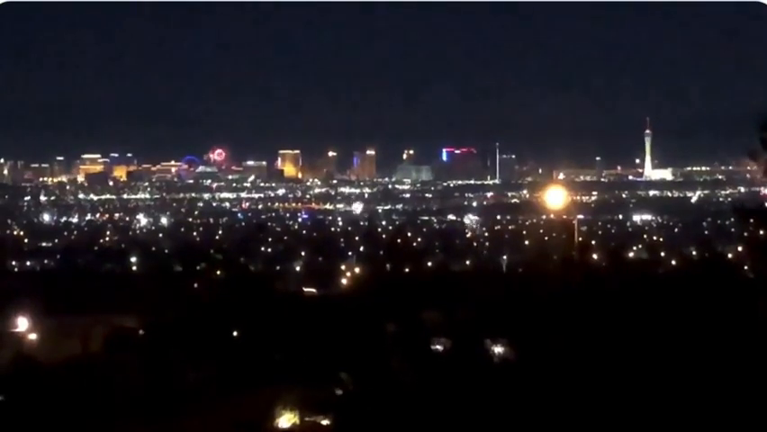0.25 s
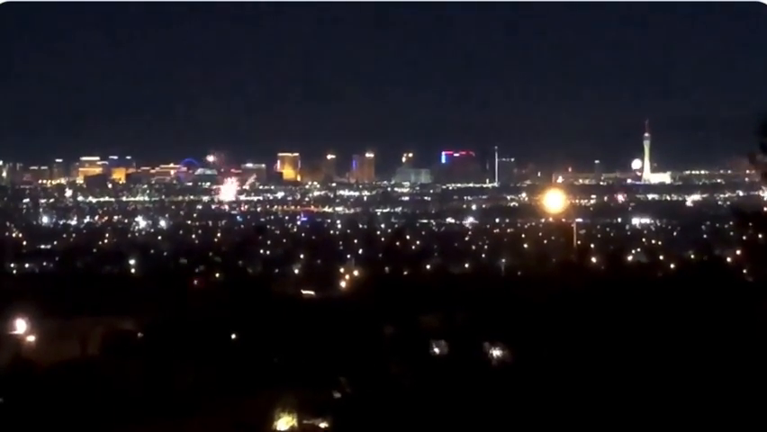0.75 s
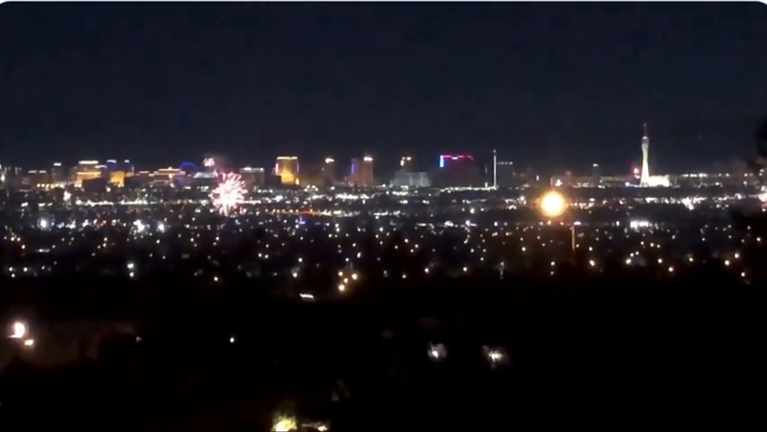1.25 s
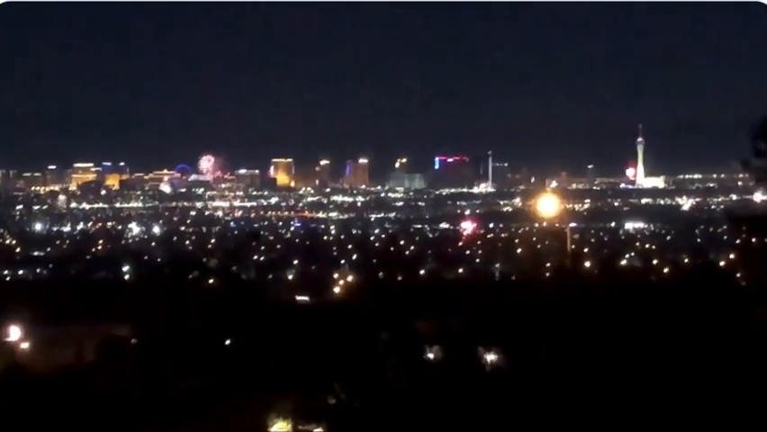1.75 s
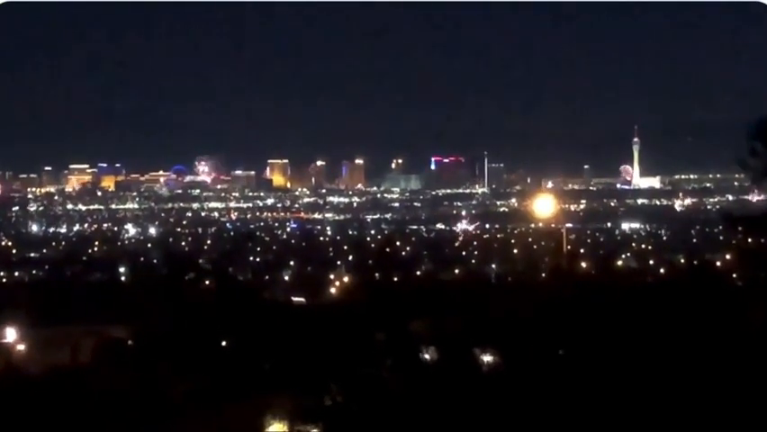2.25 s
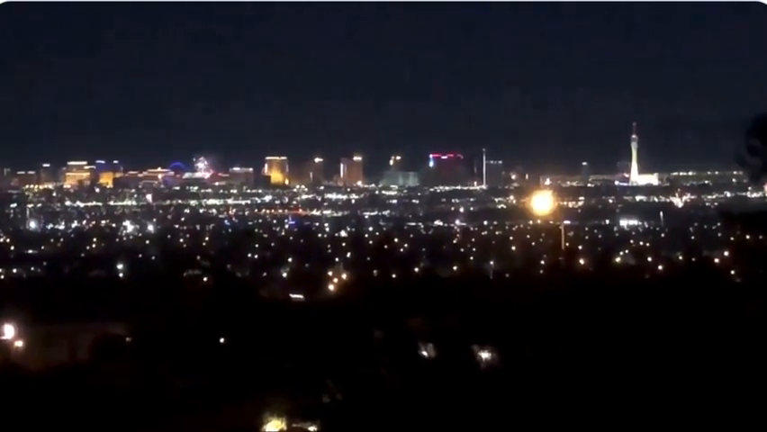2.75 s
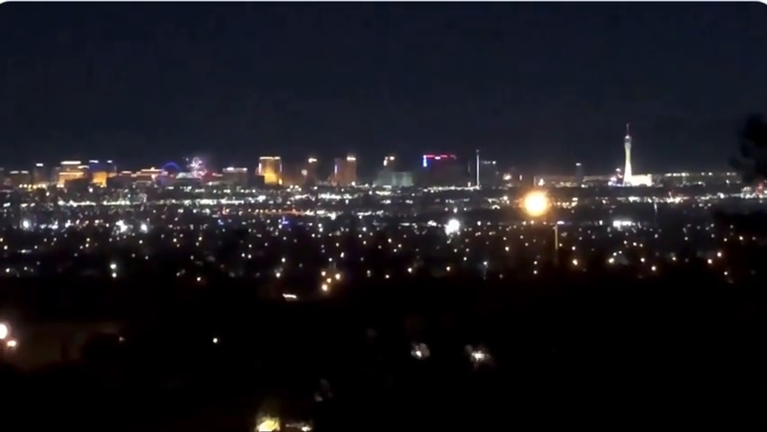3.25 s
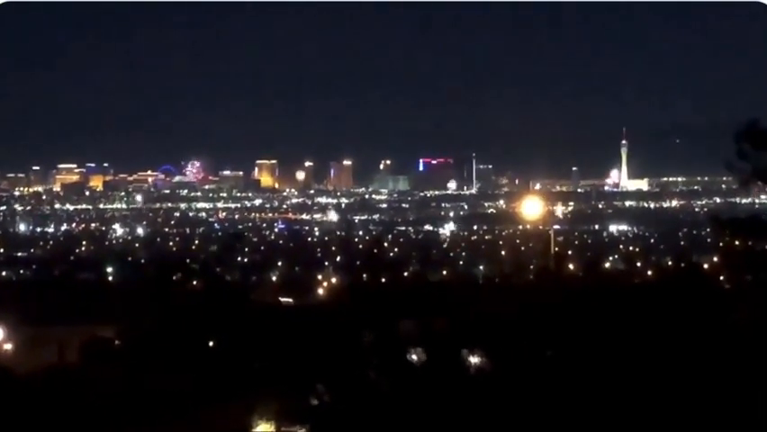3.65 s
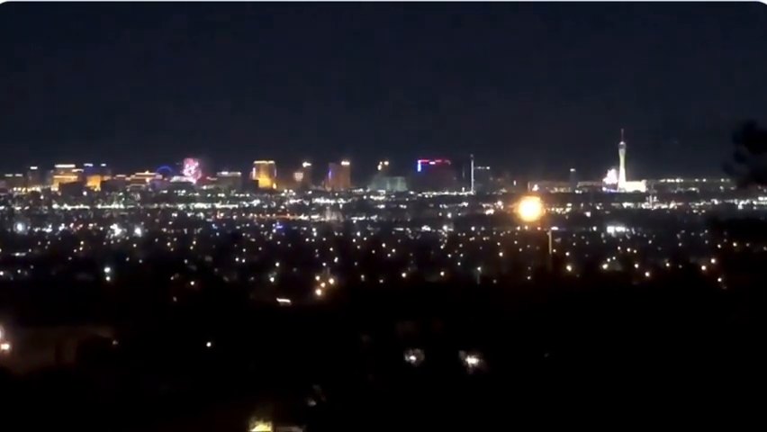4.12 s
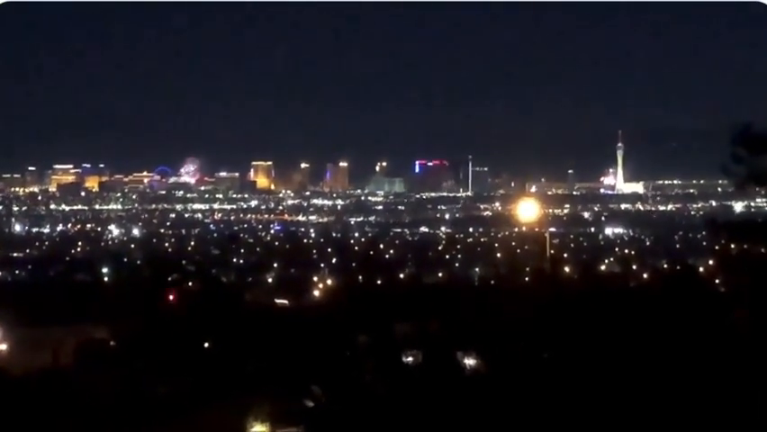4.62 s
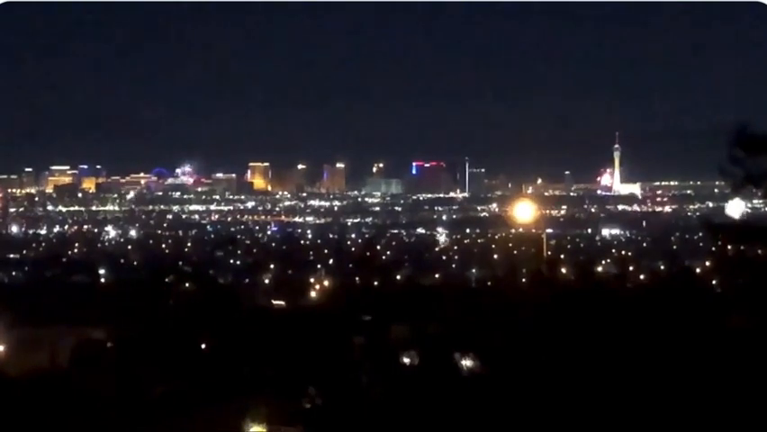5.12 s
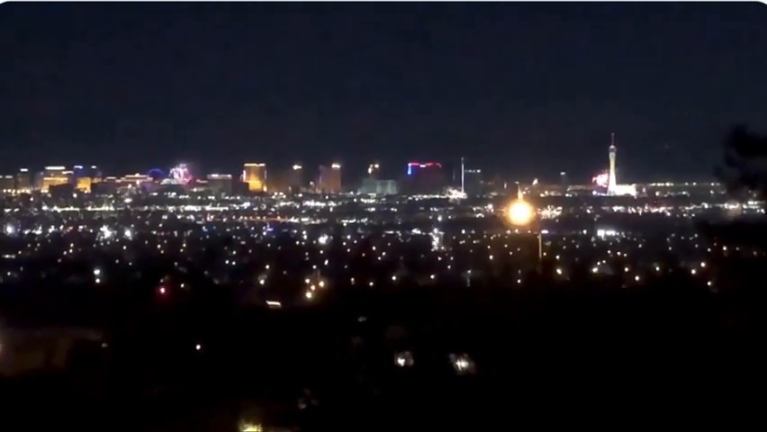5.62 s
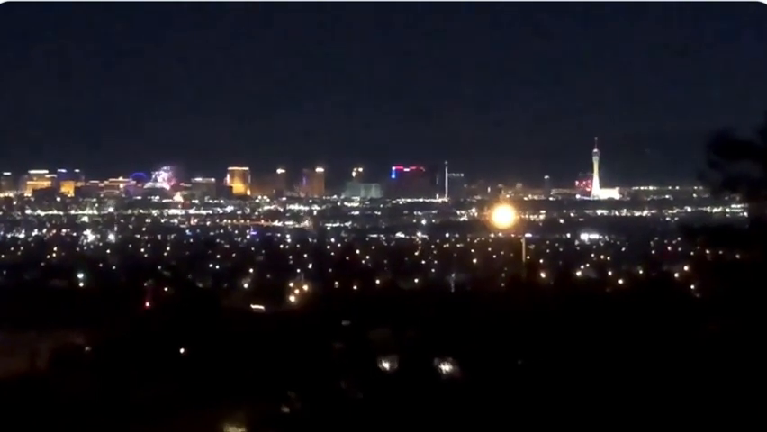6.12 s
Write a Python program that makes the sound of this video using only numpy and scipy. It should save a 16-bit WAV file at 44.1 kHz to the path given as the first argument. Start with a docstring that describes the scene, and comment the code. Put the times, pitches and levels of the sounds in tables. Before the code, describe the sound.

From a hillside above a city at night, a small microphone picks up a low rumble of faraway fireworks. The nearest burst cracks first and echoes off houses. A faint whistle drops and a rocket softly sputters, then comes a loud double bang and, later, a single duller one. Muffled pops and thuds scatter between and after them, each trailing a short street echo, while a cricket chirps very faintly.

```python
"""Night fireworks over a city, heard from a hillside through one small microphone.
Far bursts merge into a rumble throughout, over faint hiss and ticks. At 0.3 s the nearest burst cracks
and slaps back from houses. A whistle falls at 0.7 s, rocket gas rushes from 0.9 s, a faint cricket
starts at 1.3 s. Loud bursts follow at 1.5, 1.6 and 3.6 s, weaker ones to the end. Each is a pressure
pulse, dulled by the air, smeared by the ground and echoed by walls and streets."""
import sys
import numpy as np
from scipy import signal
from scipy.fft import rfft, irfft, next_fast_len
from scipy.io import wavfile
from scipy.ndimage import uniform_filter1d, minimum_filter1d

SR = 44100
rng = np.random.default_rng(int(sys.argv[2]) if len(sys.argv) > 2 else 0)


def generate_wav(signal):
    """Clip the signal to [-1, 1] and save it as 16-bit WAV at the path in sys.argv[1]."""
    frames = np.transpose(np.atleast_2d(signal))
    scaled = np.clip(frames, -1, 1) * 32767
    pcm = np.round(scaled).astype(np.int16)
    wavfile.write(sys.argv[1], SR, pcm)


N = 280917
TIME_S = np.arange(N) / SR

# distinct bursts: (time [s], level [dB], body [Hz], air cut-off [Hz])
SHELL_BURSTS = [ (.117, -30, 290, 1200), (.211, -32, 340, 900), (.307, 2.5, 250, 2600),
                (.769, -26, 280, 520), (0.987, -26.5, 170, 560), (1.0272, -26, 123, 495),
                (1.3067, -14, 393, 920), (1.435, -20, 380, 1000), (1.4409, -19, 250, 550),
                (1.4824, -3.7, 320, 1930), (1.6076, 0, 305, 1110), (1.686, -21, 250, 350),
                (1.826, -20.5, 251, 620), (1.916, -23.5, 476, 1090), (2.198, -24, 160, 498),
                (2.523, -27, 600, 956), (2.6057, -26, 187, 500), (2.6955, -25.5, 245, 430),
                (3.015, -21.5, 110, 770), (3.112, -23, 268, 920), (3.332, -27, 230, 410),
                (3.435, -29.5, 220, 780), (3.5204, -30, 280, 700), (3.6205, -6, 229, 980),
                (3.7967, -24.5, 604, 840), (3.9143, -18, 131, 780), (3.9596, -25.5, 540, 875),
                (4.1466, -16, 410, 620), (4.1834, -19.5, 433, 610), (4.377, -23.5, 189.4, 370),
                (4.4615, -14.5, 220, 594), (4.5698, -22.5, 231, 510), (4.6295, -19.5, 205, 445),
                (4.691, -27, 910, 1460), (5.0228, -28, 315, 543), (5.139, -13.5, 464, 590),
                (5.299, -23.5, 523, 660), (5.395, -27.5, 312, 760), (5.5762, -24.5, 279, 500),
                (5.7901, -14.5, 644, 1120), (5.8255, -13, 680, 1210), (5.847, -21.5, 217, 650),
                (5.9155, -24, 550, 1080), (5.927, -22.5, 196, 600), (6.323, -30, 200, 590)]
# peaks and dips of path and microphone: (centre [Hz], width [Hz], gain [dB])
PATH_COLOUR = [(312, 95, 3), (433, 81, -8), (694, 110, 3), (1817, 100, 6), (2230, 1100, -3),
               (2850, 100, 6.5), (3800, 420, -1.5), (4750, 560, 1)]
# all-pass stages of the ground smear: (centre [Hz])
GROUND_ALLPASS_HZ = (307, 646, 1200)
# house echoes of the nearest burst: (delay [s], level re burst [dB], cut-off [Hz])
HOUSE_SLAPS = [(.0375, -12.5, 653), (.0585, -12.5, 1390), (.112, -13.5, 2300)]
# envelope of the far bursts: (time [s], relative level [dB])
RUMBLE_ENVELOPE = [(0, -34), (.55, -38), (1.4, -33.5), (2.4, -38.5), (3.9, -36.5), (4.9, -39.5),
                   (6.37, -36.5)]
# merged far bursts: (frequency [Hz], relative density [dB])
RUMBLE_SPECTRUM = [(15, -69.5), (25, -56.5), (41, -25), (64, -0.5), (142, -4), (208, 0.5), (273, -8.5),
                   (337, -5.5), (409, -6.5), (441, -7), (468, -8.5), (612, -11), (2500, -37.5), (3250, -57),
                   (5500, -120)]
# rocket gas: (frequency [Hz], relative density [dB])
ROCKET_SPECTRUM = [(350, -19.5), (600, -3), (1260, -3), (1370, -5.5), (1500, -3.5), (1680, -8), (2800, -21),
                   (3930, -39), (6000, -66), (7800, -73), (13200, -120)]
# cricket song: (first chirp [s], last chirp [s])
CRICKET_PHRASES = [(1.297, 1.49), (1.757, 3.047), (3.209, 4.477), (4.664, 6.324)]
# clearest close ticks: (time [s], level [dB], centre [Hz])
NEAR_TICKS = [(.553, -56, 8000), (.673, -59.5, 9100), (1.776, -52.5, 2950), (3.178, -56.5, 8300),
              (3.731, -55, 3280), (4.924, -59, 8000), (5.108, -52, 2940), (5.885, -58.5, 8950)]
# night hiss: (frequency [Hz], relative density [dB])
HISS_SPECTRUM = [(1290, -30.5), (2200, -10.5), (2450, -7.5), (2950, -0.5), (4300, -6.5), (6900, -9.5),
                 (7800, -8.5), (8400, -8.5), (15500, -21)]


def bursts(wall_s=0.014, wall_db=-19.5, wall_hz=900, echo_cut_hz=2900, direct_cut_hz=62):
    """Each burst: direct pulse with lean bass, slap from a near wall, street echoes."""
    out = np.zeros(N)
    for start_s, db, body_hz, air_hz in SHELL_BURSTS:
        pulse = from_db(db) * blast(body_hz, air_hz)
        pitch_oct = np.log2(body_hz / 300)
        echo_db = -6.0 - 0.2894 * db - 1.6 * pitch_oct   # farther or deeper: more echo
        echo_t60_s = 0.16 - 0.0331 * db
        roll_db = -21.5 + 1.5 * pitch_oct   # light, high shells roll on more
        dulled = cut(pulse, echo_cut_hz, "low", order=2)   # by walls and trees
        add(out, start_s, cut(pulse, direct_cut_hz, "high", order=1))
        add(out, start_s + wall_s, from_db(wall_db) * cut(pulse, wall_hz, "low", order=1))
        add(out, start_s, from_db(echo_db) * street_echoes(dulled, echo_t60_s, roll_db))
    return out


def blast(body_hz, air_hz, damping=0.61, ground_q=0.8, notch_db_at_1khz=-1.5):
    """Pressure pulse, peak 1: bigger charges swing slower, farther ones lose more treble."""
    jf = 1j * np.fft.rfftfreq(2048, 1 / SR)
    s = jf / body_hz
    spectrum = s / (1 + damping * s + s * s)
    # ground bounce cancels evenly spaced bands, lower and less with distance
    notch_db = notch_db_at_1khz * (air_hz / 1000) ** 2
    notches_hz = 0.88 * air_hz * np.array([3, 5, 7]) / 3
    bounce = [(hz, 0.096 * air_hz, notch_db) for hz in notches_hz]
    for hz, width_hz, db in [*PATH_COLOUR, *bounce]:
        spectrum *= jf ** 2 + jf * width_hz * from_db(db / 2) + hz ** 2
        spectrum /= jf ** 2 + jf * width_hz * from_db(-db / 2) + hz ** 2
    for hz in GROUND_ALLPASS_HZ:   # lows trail highs by a few ms
        s = jf / hz
        spectrum *= (1 - s / ground_q + s * s) / (1 + s / ground_q + s * s)
    pulse = cut(irfft(spectrum), air_hz, "low", order=3)
    pulse = cut(pulse, 2.16 * air_hz, "low", order=6)   # air absorption steepens with pitch
    return pulse / np.abs(pulse).max()


def street_echoes(pulse, t60_s, roll_db, roll_t60_s=1.93, roll_hz=1300, build_s=0.0059, lumpy_db=3.0,
                  boom_db=0.0, boom_hz=170, boom_t60_s=0.28):
    """Many small reflections, their bass boom and a dull far roll; same energy as the pulse."""
    t = TIME_S[:SR]
    near, far, low = rng.standard_normal((3, len(t)))
    lumps = from_db(lumpy_db * np.repeat(rng.standard_normal(441), len(t) // 441))
    reflections = near * lumps * from_db(-60 * t / t60_s)
    roll = cut(far, roll_hz, "low", order=1) * from_db(roll_db - 60 * t / roll_t60_s)
    boom = cut(low, boom_hz, "low", order=2) * from_db(boom_db - 60 * t / boom_t60_s)
    onset = 1 - np.exp(-(t / build_s) ** 2)
    tail = signal.fftconvolve((reflections + roll + boom) * onset, pulse)
    return tail * np.sqrt(np.sum(pulse ** 2) / np.sum(tail ** 2))


def hillside_echoes(delay_s=0.009, scatter_db=-6.0, bite_hz=1550, bite_q=2.2, bite_db=-6.5, tail_db=1.0):
    """The nearest burst fills the hillside: long, biting scatter and deeper slaps off houses."""
    out = np.zeros(N)
    start_s, db, _, _ = max(SHELL_BURSTS, key=lambda burst: burst[1])
    pulse = blast(body_hz=240, air_hz=2900, damping=1.0, notch_db_at_1khz=0)
    pulse += from_db(bite_db) * signal.lfilter(*signal.iirpeak(bite_hz, bite_q, fs=SR), pulse)
    pulse /= np.abs(pulse).max()
    scatter = street_echoes(pulse, t60_s=0.43, roll_db=-20.5, roll_t60_s=2.6, roll_hz=1800,
                            build_s=0.011, boom_db=-2.0)
    add(out, start_s + delay_s, from_db(db + scatter_db) * scatter)
    for slap_s, slap_db, slap_hz in HOUSE_SLAPS:
        slap = from_db(db + slap_db) * blast(body_hz=180, air_hz=slap_hz, notch_db_at_1khz=0.5)
        tail = street_echoes(slap, t60_s=0.16, roll_db=-23.5, boom_db=-2.5)
        add(out, start_s + slap_s, slap)
        add(out, start_s + slap_s, from_db(tail_db) * tail)
    return out


def far_bursts(count=260, pops_db=-10.5, rumble_db=-6.0, spread_db=8.5, smear_db=1.5, smear_t60_s=0.09):
    """Small pops across the city, smeared by the streets, over their merged rumble."""
    pops = np.zeros(N)
    for when, strength, pitch_oct, brightness in rng.uniform(-1, 1, (count, 4)):
        pop = blast(body_hz=250 * 2 ** pitch_oct, air_hz=700 * 2 ** (brightness / 2))
        add(pops, (when + 1) / 2 * TIME_S[-1], from_db(spread_db * strength) * pop)
    t = TIME_S[:SR // 10]
    streets = rng.standard_normal(len(t)) * from_db(-60 * t / smear_t60_s)
    smeared = signal.fftconvolve(pops, streets)[:N]
    pops = unit_rms(unit_rms(pops) + from_db(smear_db) * unit_rms(smeared))
    envelope = from_db(np.interp(TIME_S, *np.transpose(RUMBLE_ENVELOPE)))
    return envelope * (from_db(pops_db) * pops + from_db(rumble_db) * noise(RUMBLE_SPECTRUM))


def rocket(level_db=-40.0, sputter_db=1.9, sputter_hz=60):
    """A sputtering rush of gas swells and fades."""
    gain = from_db(level_db + sputter_db * flutter(sputter_hz))
    envelope = swell(start_s=0.94, attack_s=0.16, hold_s=0.15, t60_s=1.23)
    return gain * envelope * noise(ROCKET_SPECTRUM)


def whistler(start_s=0.705, start_hz=1480, fall_oct_per_s=2.9, level_db=-45.5, blur_hz=70):
    """Short falling whistle, blurred by its many paths."""
    hz = start_hz * 2 ** (-fall_oct_per_s * np.maximum(TIME_S - start_s, 0))
    tone = np.sin(2 * np.pi * np.cumsum(hz) / SR)
    envelope = swell(start_s, attack_s=0.027, hold_s=0.06, t60_s=0.24)
    return from_db(level_db) * envelope * flutter(blur_hz) * tone


def cricket(full_db=-62, shy_db=9, warm_up_s=1.3, period_s=0.098, pair_s=0.017, stroke_s=0.003,
            pitch_hz=7780, detune_hz=40, fall_hz_per_s=50000):
    """Two short wing strokes per chirp, each falling in pitch; the song starts soft and warms up."""
    out = np.zeros(N)
    t = TIME_S[:SR // 50] - 0.01   # centred on the stroke
    song_start_s = CRICKET_PHRASES[0][0]
    for first_s, last_s in CRICKET_PHRASES:
        for chirp_s in np.linspace(first_s, last_s, round((last_s - first_s) / period_s) + 1):
            db = full_db - shy_db * np.exp((song_start_s - chirp_s) / warm_up_s)
            for delay_s, (detune, force_db) in zip((0, pair_s), rng.standard_normal((2, 2))):
                cycles = (pitch_hz + detune_hz * detune) * t - fall_hz_per_s * t * t / 2
                stroke = np.exp(-(t / stroke_s) ** 2) * np.sin(2 * np.pi * cycles)
                add(out, chirp_s + delay_s + t[0], from_db(db + force_db) * stroke)
    return out


def ticks(t60_s=0.056, rise_s=0.002, edge_ratio=1.6, faint_count=12, faint_db=-67.5, faint_hz=6000):
    """Tiny dry puffs of band noise; the faintest fall at random."""
    out = np.zeros(N)
    t = TIME_S[:SR // 10]
    envelope = (1 - np.exp(-t / rise_s)) * from_db(-60 * t / t60_s)
    faint = [(when * TIME_S[-1], faint_db, faint_hz * 2 ** (pitch - 0.5))
             for when, pitch in rng.random((faint_count, 2))]
    for start_s, db, hz in [*NEAR_TICKS, *faint]:
        puff = cut(rng.standard_normal(len(t)), hz / edge_ratio, "high", order=2)
        puff = cut(puff, hz * edge_ratio, "low", order=2)
        add(out, start_s, from_db(db) * envelope * unit_rms(puff))
    return out


def night_hiss(level_db=-70, flicker_db=2.0, flicker_hz=45):
    """Faint hiss with a flickering level."""
    return from_db(level_db + flicker_db * flutter(flicker_hz)) * noise(HISS_SPECTRUM)


def noise(spectrum):
    """Noise of a given spectrum with steep skirts, rms 1."""
    hz, db = np.transpose(spectrum)
    size = next_fast_len(N)
    bins_hz = np.fft.rfftfreq(size, 1 / SR) + 0.0011   # avoids log(0)
    skirts = np.minimum(1, np.minimum(bins_hz / hz[0], hz[-1] / bins_hz)) ** 4
    gain = from_db(np.interp(np.log(bins_hz), np.log(hz), db)) * skirts
    return unit_rms(irfft(rfft(rng.standard_normal(size)) * gain, size)[:N])


def flutter(hz):
    """Low-passed noise, rms 1."""
    return unit_rms(cut(rng.standard_normal(N), hz, "low", order=2))


def swell(start_s, attack_s, hold_s, t60_s):
    """Envelope, peak 1: rounded rise, hold, exponential fade."""
    t = TIME_S - start_s
    rise = np.sin(np.pi / 2 * np.clip(t / attack_s, 0, 1))
    return rise * from_db(-60 * np.maximum(t - attack_s - hold_s, 0) / t60_s)


def cut(x, hz, kind, order):
    """Butterworth low- or high-pass."""
    sos = signal.butter(order, np.clip(hz, 10, SR / 2 - 1000), kind, fs=SR, output="sos")
    return signal.sosfilt(sos, x)


def add(out, start_s, sound):
    """Mix a sound in at start_s."""
    i = int(np.clip(start_s * SR, 0, N - 1))
    out[i:i + len(sound)] += sound[:N - i]


def from_db(db):
    """Decibels to gain."""
    return 10 ** (np.asarray(db) / 20)


def unit_rms(x):
    """Scale to rms 1."""
    return x / np.sqrt(np.mean(x ** 2) + 1e-20)


def scene(bass_cut_hz=42):
    """Mono mix; the small microphone loses the deepest bass of the distinct bursts."""
    near = cut(bursts() + hillside_echoes(), bass_cut_hz, "high", order=2)
    fireworks = near + far_bursts() + rocket() + whistler()
    return (fireworks + night_hiss() + cricket() + ticks())[None]


def record(dry, ceiling=0.67, release_db_per_s=300, cutoff_hz=15800):
    """Fast limiter on the loudest cracks, then a steep low-pass."""
    over_db = 20 * np.log10(np.maximum(np.abs(dry[0]) / ceiling, 1))
    release_db = release_db_per_s * TIME_S
    held_db = np.maximum.accumulate(over_db + release_db) - release_db
    gain = minimum_filter1d(from_db(-held_db), size=129)   # look-ahead
    gain = uniform_filter1d(gain, size=129)
    return signal.sosfilt(signal.ellip(10, 0.1, 80, cutoff_hz, fs=SR, output="sos"), dry * gain)


dry = scene()
out = record(dry)
generate_wav(out)
```